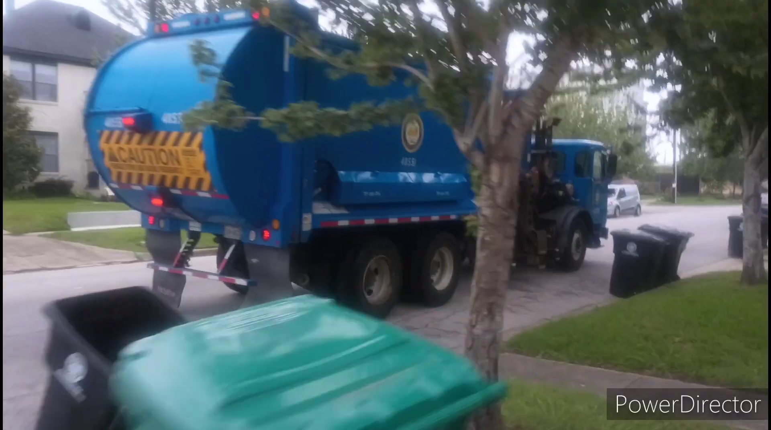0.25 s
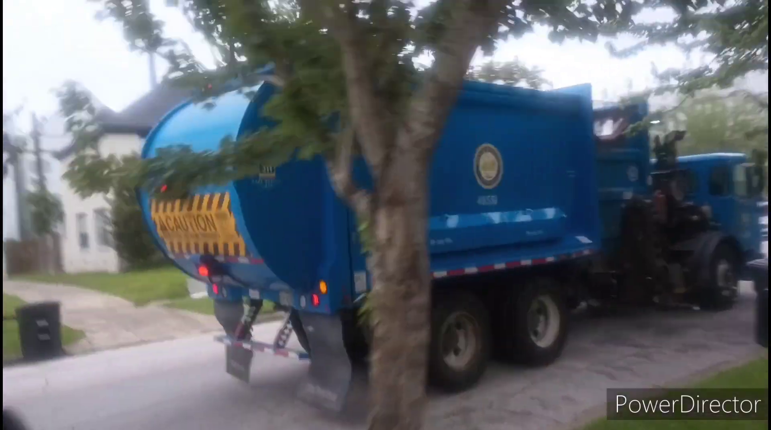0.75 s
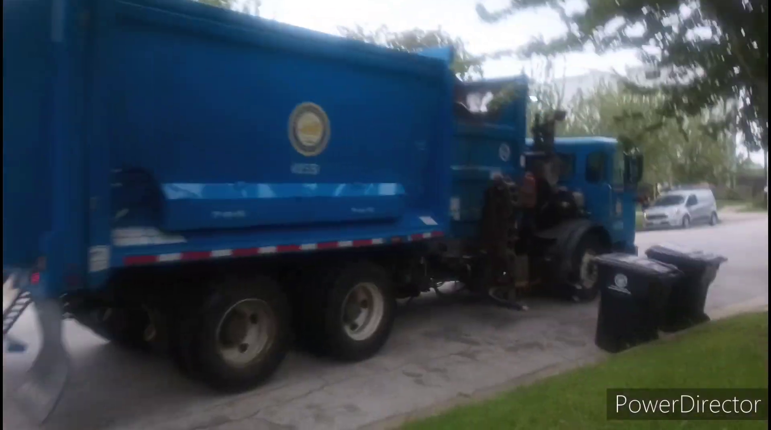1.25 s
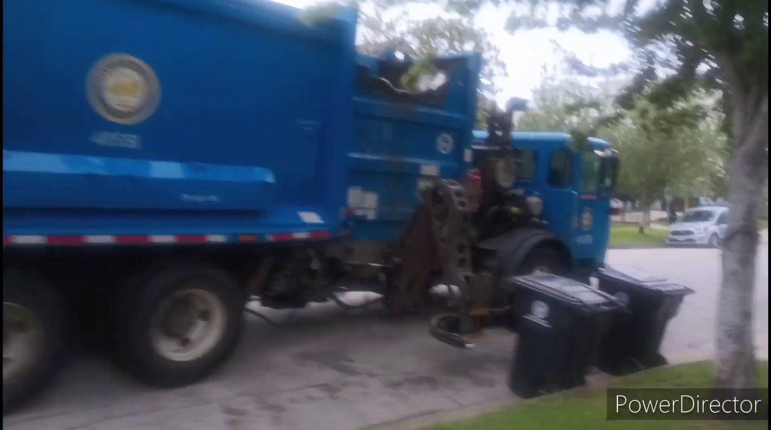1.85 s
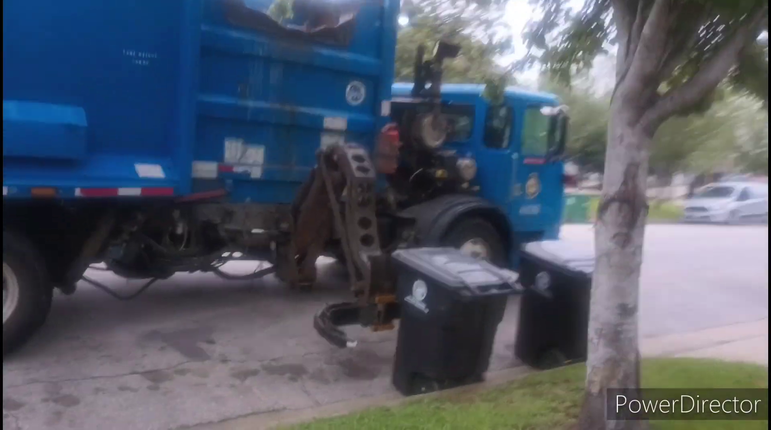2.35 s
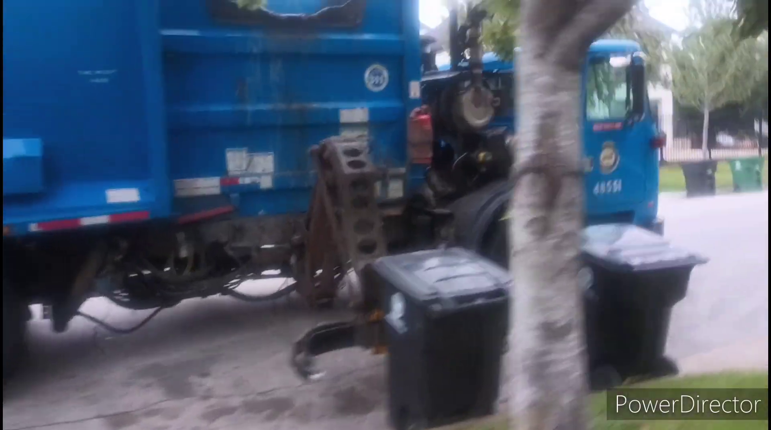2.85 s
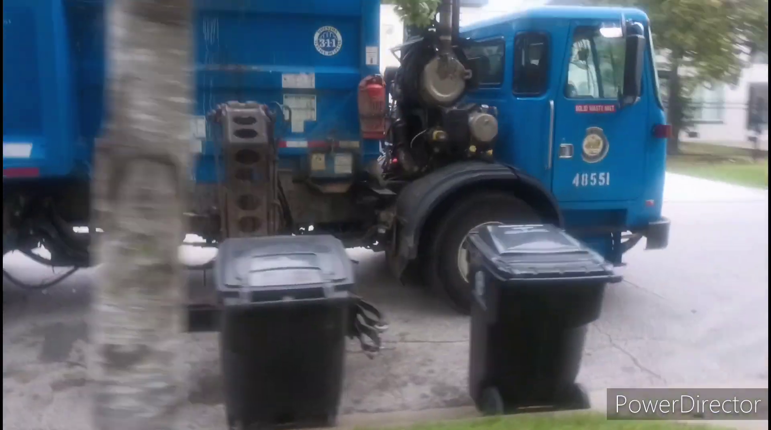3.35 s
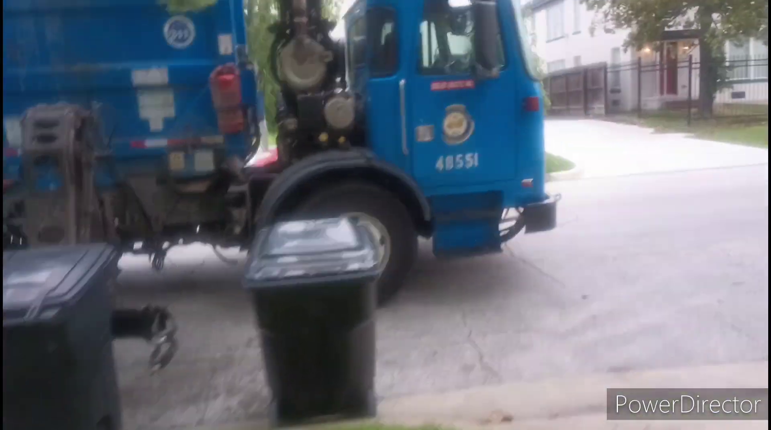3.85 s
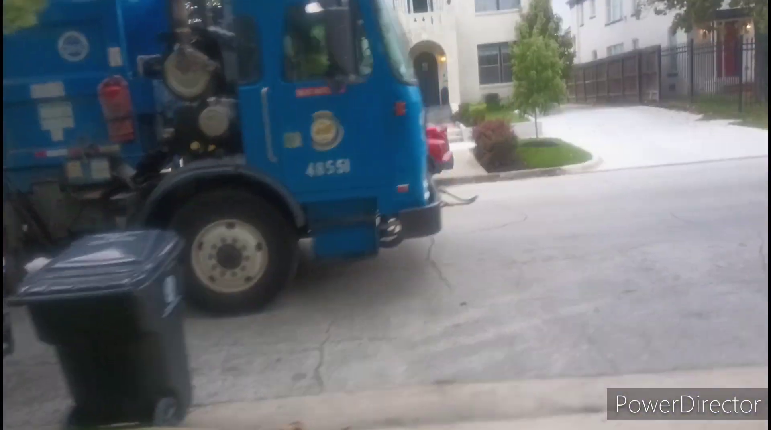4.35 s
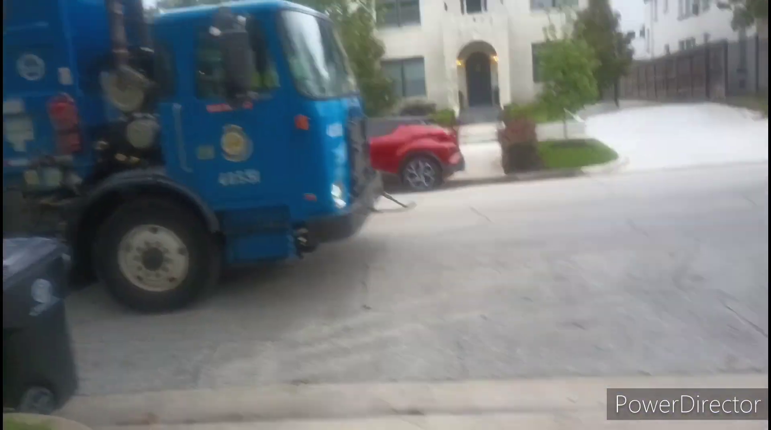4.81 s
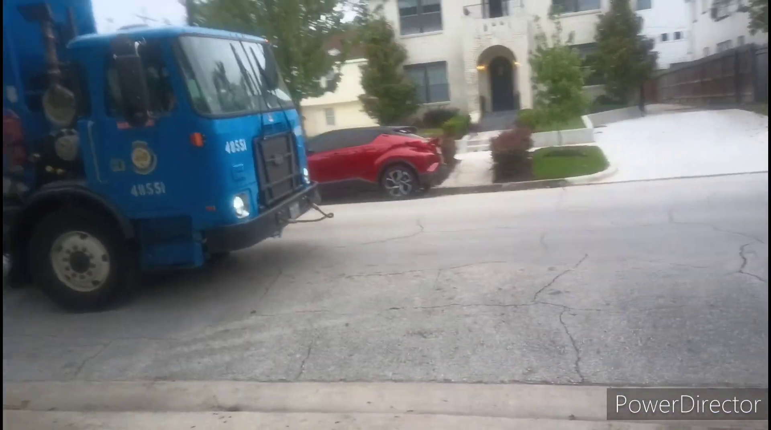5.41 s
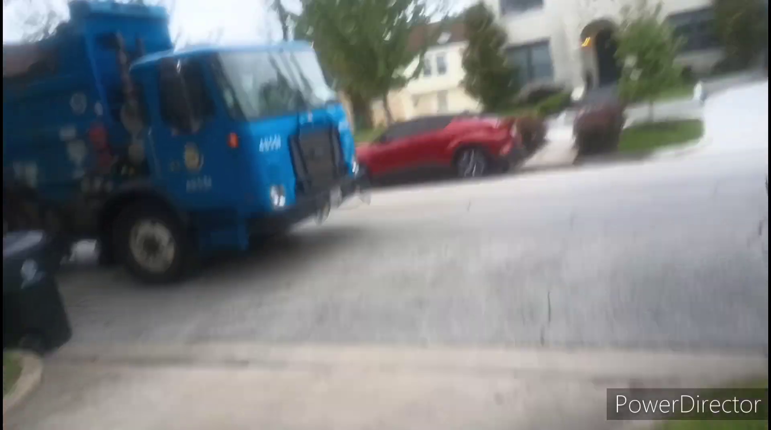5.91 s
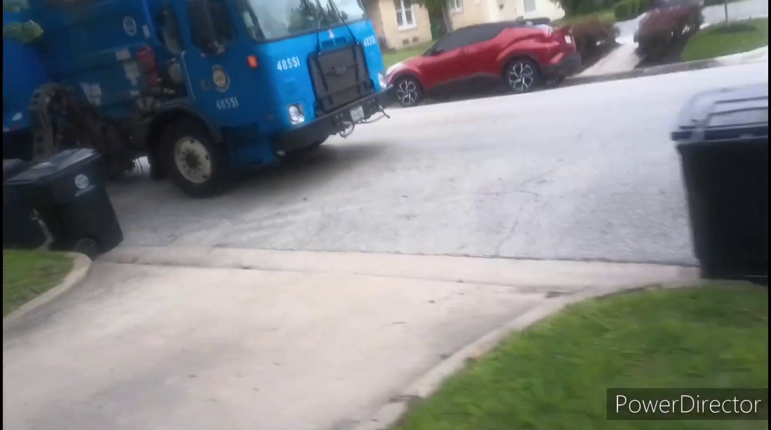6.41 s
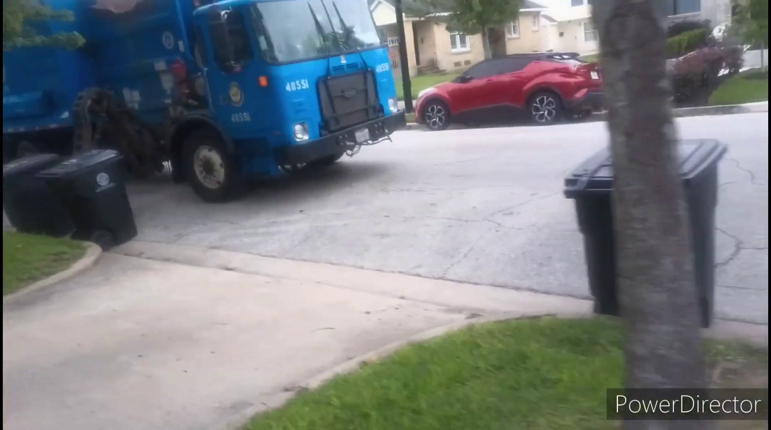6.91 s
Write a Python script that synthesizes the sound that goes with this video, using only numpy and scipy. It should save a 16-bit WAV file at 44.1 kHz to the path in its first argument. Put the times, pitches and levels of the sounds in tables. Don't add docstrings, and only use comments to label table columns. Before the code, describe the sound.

Outdoor street, phone carried past a large idling truck. A faint opening drops to silence, then brake squeal, clanks and a brief valve hiss arrive together. Hard metal blows follow, then steady diesel clatter, hydraulic whine and small taps, with uneven low wind buffeting stronger on the left. A sharp compressed-air blast roars and sizzles, tails into a descending whistle, and leaves softer idling with tiny ticking.

```python
import sys
import numpy as np
from scipy import signal
from scipy.fft import rfft, irfft, next_fast_len
from scipy.io import wavfile
from scipy.ndimage import uniform_filter1d, map_coordinates

SR = 44100
rng = np.random.default_rng(int(sys.argv[2]) if len(sys.argv) > 2 else 0)


def generate_wav(sig):
    pcm = np.round(np.clip(np.atleast_2d(sig).T, -1, 1) * 32767).astype(np.int16)
    wavfile.write(sys.argv[1], SR, pcm)


def linear_from_db(decibels):
    return 10 ** (np.asarray(decibels, float) / 20)


N = 316152

# (time [s], peak [dB], pitch [Hz], left minus right [dB])
EDDIES = [(.538, -20.5, 95.6, 5), (.552, -30.5, 198, 5), (2.373, -24, 104, 12), (2.466, -17, 199, 17),
          (2.609, -21, 75, 9), (2.635, -26, 120, 6), (1.364, -21, 84, 16), (1.747, -15, 135, 22),
          (2.434, -14.5, 90, 17), (2.486, -13, 125, 20), (2.543, -17.5, 167, 26), (2.658, -28, 128, 1),
          (3.508, -12, 136, 20), (3.585, -13.5, 195, 24), (3.618, -14, 255, 21), (3.685, -10, 173, 27.5),
          (3.753, -12.5, 350, 26), (3.789, -15, 290, 22), (3.858, -18, 199, 35), (3.97, -17, 145, 14),
          (4.057, -14, 174, 16), (4.267, -24.5, 153, 14), (4.321, -18.5, 172, 10), (4.678, -19, 115, 24.0),
          (6.456, -24, 99.6, -20)]


def unit(x):
    return x / np.sqrt(np.mean(x ** 2) + 1e-20)


def along(points, hz):
    f, v = np.transpose(points)
    return np.interp(np.log(hz + 1), np.log(f + 1), v)


def curves(rows):
    s, *cols = np.transpose(rows)
    return [np.interp(np.arange(N) / SR, s, c) for c in cols]


def during(rows, fade):
    t = np.arange(N) / SR
    return np.clip(np.minimum(t - rows[0][0], rows[-1][0] - t) / fade, 0, 1)


def wobble(rate, count=N):
    knots = int(count * rate / SR) + 2
    return np.interp(np.arange(count) * rate / SR, np.arange(knots), rng.standard_normal(knots))


def filtered(x, response):
    m = next_fast_len(N + 8192)
    return irfft(rfft(x, m) * response(np.fft.rfftfreq(m, 1 / SR)), m)[..., :N]


def resonances(modes, f):
    total = 0
    for k, (c, w, db) in enumerate(modes):
        total = total + (-1) ** k * linear_from_db(db) * 1j * f * w / (c * c - f * f + 1j * f * w)
    return total


def rush(spectrum, patchy_db, modes=(), lift=0, alike=None, size=512):
    # (frequency [Hz], left-right correlation)
    usual_alike = [(300, 0.81), (1000, 0.8), (2500, 0.45), (6000, 0.35), (12000, 0.2)]
    if alike is None:
        alike = usual_alike
    z = signal.stft(rng.standard_normal((2, N)), nperseg=size)[2]
    field = uniform_filter1d(rng.standard_normal(z.shape[1:]), size=3, axis=0)
    field = uniform_filter1d(field, size=8, axis=1)
    pair = signal.istft(z * linear_from_db(patchy_db * unit(field)), nperseg=size)[1][:, :N]

    def mid_side(hz):
        turn = np.arccos(np.clip(along(alike, hz), -1, 1)) / 2
        colour = linear_from_db(along(spectrum, hz)) * (1 + lift * np.abs(resonances(modes, hz)))
        return colour * [np.cos(turn), np.sin(turn)]

    mid, side = filtered(pair, mid_side)
    return unit(np.array([mid + side, mid - side]))


def panned(x, pan_db):
    return x * linear_from_db(np.array([pan_db / 2, -pan_db / 2]))


def ports(pan_db):
    return linear_from_db(np.minimum([[pan_db - 4.5], [7.0 - pan_db]], 5))


def whine(hz, spread_hz, count=N):
    phase = 2 * np.pi * np.cumsum(hz + spread_hz * wobble(500, count)) / SR
    grip = linear_from_db(2.2 * wobble(40, count))
    out = []
    for port in range(2):
        strength = grip * linear_from_db(2.4 * wobble(140, count))
        out.append(strength * np.sin(phase + 1.4 * wobble(25, count)))
    return np.array(out)


def sing(rows, spread_hz):
    hz, db = curves(rows)
    return during(rows, 0.0074) * linear_from_db(db) * whine(hz, spread_hz)


def glide(s, length, from_hz, to_hz, db, spread_hz, soft):
    u, out = np.linspace(0, 1, int(length * SR)), np.zeros((2, N))
    swell = np.abs(np.sin(np.pi * u)) ** soft
    tone = whine(from_hz + (to_hz - from_hz) * u, spread_hz, len(u))
    out[:, round(s * SR):][:, :len(u)] = linear_from_db(db) * swell * tone
    return out


def snaps(rows, spectrum, t60):
    strength, t = np.zeros(N + SR), np.arange(SR // 10) / SR
    for s, db in rows:
        strength[round(s * SR):][:len(t)] += linear_from_db(db - 60 * t / t60)
    return strength[:N] * rush(spectrum, 1.5)


def blows(t60, bright=False):
    # (time [s], peak [dB], bright share [dB])
    clanks = [(0.564, -31, 6), (0.591, -32.5, -5), (0.751, -18.5, -4), (0.77, -25.5, 2), (0.831, -18, -3.5),
              (0.849, -45, -15), (0.935, -29, 3), (1.409, -41, 15), (1.474, -17, -9), (1.494, -37, 20),
              (1.522, -13.5, 0.5), (1.579, -21.5, -7), (1.675, -24.5, -2), (1.9, -36, 6),
              (2.542, -24.5, -4), (2.66, -35.5, 5.5), (2.704, -27.5, -27), (3.418, -27, -19),
              (5.876, -48, 10.5)]
    out, t = np.zeros(N + SR), np.arange(SR // 2) / SR
    for s, peak_db, bright_db in clanks:
        db = peak_db + (bright_db if bright else 0)
        out[round(s * SR):][:len(t)] += linear_from_db(db - 60 * t / t60) * (1 - np.exp(-t / 0.0083))
    return out[:N]


def street(beat):
    # (time [s], level [dB])
    hiss = [
        (0, -64.5),
        (.3, -65),
        (.56, -43.5),
        (.95, -50),
        (1.6, -40.5),
        (2.5, -46.5),
        (3.5, -47.5),
        (6.2, -50.5),
        (7.17, -56),
    ]
    # (frequency [Hz], level [dB])
    hiss_colour = [(4410, -10), (7500, -4.5), (8310, -8), (9210, -8), (11400, -12.5), (13400, -14),
                   (14900, -2.5), (15800, -7.5)]
    level_db, = curves(hiss)
    return linear_from_db(level_db) * panned(rush(hiss_colour, 1.4), np.array([2.5])) * unit(1 + 0.19 * beat)


def wind():
    # (time [s], level [dB], left minus right [dB])
    buffeting = [(.5, -50, -1), (.6, -39.5, -5), (.86, -49, -10), (1.1, -42.5, 7), (1.45, -32, 4),
                 (1.62, -38, -14), (1.95, -34.5, 10), (2.28, -38.5, 1), (2.47, -42.5, 9), (2.7, -36, 0.5),
                 (3.4, -39.5, 2), (3.53, -39, 13), (4.1, -30.5, 13), (4.66, -37, 15), (4.73, -46.5, 12),
                 (5.45, -50.5, 7.5), (5.7, -46, -1), (7.17, -55.5, 1)]
    # (frequency [Hz], level [dB])
    rumble = [(22, -35), (60, -4.5), (113, 0), (193, -5), (268, -13), (303, -21), (400, -28), (520, -18.5),
              (880, -120)]
    puff_db, puff_s = -23.5, 0.047
    db, pan_db = curves(buffeting)
    t = np.arange(N) / SR
    share = np.sqrt(2 / np.cosh(pan_db * np.log(10) / 20))
    gust = share * panned(linear_from_db(db), pan_db)
    for s, peak_db, hz, side_db in EDDIES:
        gust = gust + linear_from_db(peak_db + puff_db) * ports(side_db) * np.exp(-((t - s) / puff_s) ** 2)

    def lumps(rate):
        return linear_from_db(2.6 * np.array([wobble(rate), wobble(rate)]))

    low = unit(lumps(16) * rush(rumble, 2.1, alike=[(100, 0.31)]))
    flap_colour = [(70, -26), (140, 3.5), (230, 3.5), (380, -1), (700, -34)]
    flap = unit(lumps(30) * rush(flap_colour, 2.6, alike=[(100, 0.28)]))
    return linear_from_db(-1.0) * gust * low + linear_from_db(8.5) * gust ** 1.54 * flap


def thumps():
    out, t = np.zeros((2, N + SR)), np.arange(SR // 8) / SR
    for s, db, hz, pan_db in EDDIES:
        swing = linear_from_db(db - 60 * t / 0.069) * (1 - np.exp(-t / 0.00097)) * np.sin(2 * np.pi * hz * t)
        out[:, round(s * SR):][:, :len(t)] += swing * ports(pan_db)
    return filtered(out[:, :N], lambda hz: (1j * hz / (45 + 1j * hz)) ** 2)


def pins():
    # (time [s], peak [dB], pitch [Hz], t60 [s])
    struck = [
        (1.4936, -14, 5770, 0.086),
        (1.522, -21, 3550, .07),
        (1.675, -21, 3500, .06),
        (1.681, -31.5, 6400, 0.22),
        (3.907, -26, 4560, 0.051),
        (5.447, -27, 6240, 0.069),
    ]
    out, t = np.zeros(N + SR), np.arange(SR // 4) / SR
    for s, db, hz, t60 in struck:
        decay = linear_from_db(db - 60 * t / t60 + 1.5 * wobble(140, len(t)))
        out[round(s * SR):][:len(t)] += decay * (1 - np.exp(-t / 0.00074)) * np.sin(2 * np.pi * hz * t)
    return out[:N]


def rings():
    # (time [s], length [s], pitch [Hz], level [dB])
    squeaks = [(.68, 0.074, 10700, -41), (.81, 0.24, 10560, -33), (1.05, 0.075, 11000, -29),
               (1.1, 0.048, 8140, -28), (1.1, 0.084, 11000, -48), (.72, .08, 13850, -38),
               (.71, 0.027, 4040, -41.5), (0.765, 0.04, 560, -33), (.92, 0.039, 1372, -28),
               (1.0, 0.081, 662, -37.5), (1.09, 0.059, 650, -35), (1.09, 0.061, 1210, -34.5),
               (1.3, 0.12, 2200, -35), (2.7, 0.079, 1824, -35), (6.96, .05, 4600, -57),
               (2.0, 0.15, 5100, -44), (2.17, 0.21, 5000, -44), (3.258, 0.14, 4350, -41),
               (2.15, 0.16, 4040, -48), (4.745, 0.14, 541, -40.5)]
    out, t = np.zeros((2, N + SR)), np.arange(SR // 2) / SR
    for s, length, hz, db in squeaks:
        swell = np.sin(np.pi * np.clip(t / length, 0, 1)) ** 0.2 * linear_from_db(3 * wobble(60, len(t)))
        tone = whine(hz, 10 + .03 * min(hz, 5500), len(t))
        out[:, round(s * SR):][:, :len(t)] += linear_from_db(db + 3) * swell * tone
    return out[:, :N]


def metalwork():
    # (frequency [Hz], width [Hz], level [dB])
    steel = [(680, 19, -5), (1070, 63, -10.5), (1830, 35, -41), (3440, 270, -5.5), (3870, 29, -2),
             (5100, 53, -22), (5740, 20, 4), (6500, 21, -9), (6920, 30, -1)]
    # (start [s], length [s], from [Hz], to [Hz], level [dB])
    panel_hums = [
        (1.8, .8, 1130, 1050, -42),
        (2.12, .5, 1920, 1900, -43),
        (2.5, .58, 1900, 1850, -38),
        (2.85, .52, 990, 1030, -41),
        (3.3, .5, 1920, 1850, -37),
        (3.44, .7, 1725, 1725, -40),
        (3.6, .5, 930, 950, -44),
        (4.02, .55, 1010, 980, -42),
        (2.55, .3, 1620, 1540, -43),
    ]
    # (time [s], peak [dB])
    hard_edges = [(.5538, -32), (.5637, -26), (.5707, -27), (.603, -20), (.7513, -19), (.772, -21),
                  (.778, -13), (.8346, -15), (.85, -17), (.9369, -20), (1.4772, -23), (1.4821, -17),
                  (1.4936, -19), (1.5235, -7.5), (1.528, -20), (1.536, -16), (1.544, -11), (1.551, -17),
                  (1.587, -16), (1.603, -21), (1.705, -16), (.842, -19), (.858, -22), (2.71, -27),
                  (5.8785, -33), (5.895, -38), (6.405, -39.5), (6.984, -42)]
    # (time [s], peak [dB])
    clicks = [(5.7194, -50), (5.7694, -53), (5.8257, -56), (5.8745, -54), (6.0094, -53), (6.0541, -50),
              (6.1035, -52), (6.1419, -49), (6.1863, -46), (6.2322, -47), (6.2761, -52), (6.322, -49),
              (6.3644, -49), (6.4144, -54), (6.4587, -54), (6.5071, -51), (6.5535, -52), (6.6094, -49),
              (6.6594, -54), (6.7164, -55), (6.7795, -52), (6.8423, -52), (6.9022, -50), (6.9636, -54),
              (7.0319, -55), (7.0998, -50)]
    # (time [s], peak [dB])
    firing_ticks = [(2.0717, -30), (2.2498, -30), (2.4553, -32), (2.5042, -29), (2.5376, -26), (2.5556, -23),
                    (2.584, -27), (2.6319, -31), (2.6574, -27), (2.7581, -35), (2.814, -28), (2.9168, -31),
                    (3.2774, -26), (3.3303, -29), (3.3837, -32), (3.4356, -29), (3.4865, -33), (3.5404, -32),
                    (3.6466, -31), (4.2303, -33), (4.3849, -32), (4.4917, -33), (5.8785, -33)]
    clank_t60 = 0.17
    body = rush([(300, -9), (550, 6.5), (1200, 12.5), (2600, 12.5), (3600, -36.0)], 3.0, steel, lift=0.25)
    edge_colour = [(2200, -25.5), (3000, -1.0), (6500, -9.5), (9000, -19.0), (15000, -34.5)]
    edge = rush(edge_colour, 3.3, steel, lift=1.8)
    clanking = blows(clank_t60) * body + linear_from_db(-1.5) * blows(clank_t60, bright=True) * edge
    hums = linear_from_db(3) * sum(glide(*row, spread_hz=65, soft=.4) for row in panel_hums)
    crack_colour = [(300, -26), (800, -4), (2500, 1), (4500, -5.5), (7500, -13), (12000, -31)]
    cracks = linear_from_db(-6) * snaps(hard_edges, crack_colour, t60=.025)
    click_colour = [(6000, -40), (12000, -16), (14000, -6), (15000, 0), (15800, -6)]
    ratchet = linear_from_db(2.5) * snaps(clicks, click_colour, t60=.035)
    tap_colour = [(2000, -25), (3500, -7), (4600, -1), (5600, -4), (6600, 0), (8000, -14), (12000, -30)]
    taps = linear_from_db(-7) * snaps(firing_ticks, tap_colour, t60=0.045)
    return taps + hums + cracks + ratchet + pins() + rings() + clanking


def brakes():
    # (time [s], pitch [Hz], level [dB])
    main_modes = [
        [(.63, 9486, -46), (.658, 9680, -26), (.72, 9790, -21), (.77, 9830, -23), (.795, 9720, -17),
         (.82, 9760, -12), (.89, 9930, -15), (.94, 9960, -36)],
        [(.87, 10140, -34), (.9, 10170, -18), (.96, 10210, -21), (1.02, 10150, -17), (1.07, 10020, -17),
         (1.11, 9870, -22), (1.165, 9860, -24), (1.2, 9900, -40)],
    ]
    # (start [s], length [s], from [Hz], to [Hz], level [dB])
    side_modes = [
        (.745, .22, 11930, 12280, -41),
        (.53, .2, 14950, 14350, -43),
        (.73, .17, 14450, 15100, -33),
        (1.155, .06, 12750, 12650, -36),
        (1.215, .09, 12130, 11980, -35),
        (1.28, .16, 11980, 12170, -34),
        (.89, .17, 13470, 13400, -32),
        (.76, .1, 6750, 6600, -33),
    ]
    # (time [s], extra level [dB])
    grips = [(.683, 4), (.711, 4), (.731, 4), (.772, 5), (.815, 2), (.848, 5), (.858, 4), (.87, 6),
             (.887, 8), (.901, 8), (.914, 4), (.934, 5), (.953, 4), (1.019, 8), (1.039, 6), (1.065, 7),
             (1.093, 4), (1.119, 5), (1.163, 5)]
    grip_s, slack_db = .004, -4
    t = np.arange(N) / SR
    jerk_db = slack_db + sum(db * np.exp(-((t - s) / grip_s) ** 2) for s, db in grips)
    loud = linear_from_db(jerk_db + 0.2) * sum(sing(rows, spread_hz=55) for rows in main_modes)
    rest = linear_from_db(3.5) * sum(glide(*row, spread_hz=55, soft=.6) for row in side_modes)
    return panned(loud, np.array([3.5])) + panned(rest, np.array([1.2]))


def air():
    # (time [s], flow [dB], sharpness [dB]: high pressure sizzles, low pressure roars)
    bursts = [
        [(.92, -46, -3), (.96, -30, 6), (1.032, -23, 4), (1.228, -29, 10), (1.318, -44, 10), (1.46, -30.5, -6)],
        [(4.59, -47, -8), (4.62, -25.5, 9.5), (4.67, -18.5, 3), (4.926, -17.5, -4), (5.08, -22, -3.5),
         (5.1, -24.5, -8), (5.252, -32, -1.5), (5.48, -39.5, 7), (5.85, -53.5, -5)],
    ]
    burst_pan_db = (1.8, 2.5)
    # (time [s], pitch [Hz], level [dB])
    last_air = [
        (5.17, 9500, -46),
        (5.24, 8450, -39),
        (5.3, 7800, -37),
        (5.36, 7200, -34.5),
        (5.44, 6230, -35),
        (5.52, 5150, -38),
        (5.57, 4450, -38),
        (5.62, 3900, -52),
    ]
    # (frequency [Hz], width [Hz], level [dB])
    nozzle = [(1840, 60, -4), (2800, 250, -2), (4300, 450, 2), (5120, 150, -4), (6860, 350, 0)]
    # (frequency [Hz], level [dB])
    roar_colour = [(760, -61), (1300, -19), (1550, -11), (1890, 0.5), (2330, -2), (2810, 3), (3500, -2),
                   (4550, -63.5), (7700, -120)]
    jet_colour = [(1940, -60.5), (3300, -3), (3470, -3.5), (4810, -6), (5980, 3), (6830, -4.5),
                  (8200, -8.5), (13000, -21)]
    sizzle_colour = [(4410, -28), (7500, 2), (7960, 1.5), (9160, 6), (9930, 5), (13500, 1), (14900, 5.5),
                     (15500, 10), (15800, -5)]
    # (frequency [Hz], left-right correlation)
    jet_alike = [(1000, .5), (2400, .4), (3200, .88), (3900, .88), (4800, .4), (8000, .5), (12000, .2)]
    roar_db, sizzle_db, sizzle_follows = -9.5, 0.5, 0.5
    subsonic_s, dull_hz, dull_db = 5.08, 10500, -5
    flow_db, sharp_db = curves(sum(bursts, []))
    flutter = linear_from_db(0.7 * wobble(900))
    roar = rush(roar_colour, 1.8, nozzle, lift=0.56, alike=jet_alike)
    jet = rush(jet_colour, 2.3, nozzle, lift=1.2, alike=jet_alike, size=1024)
    jet = linear_from_db(flow_db + roar_db - sharp_db) * roar + linear_from_db(flow_db) * jet
    jet = filtered(jet, lambda hz: 1 - .1 * np.exp(-((hz - 3500) / 220) ** 2))
    sizzle = linear_from_db(flow_db + sizzle_db + sizzle_follows * sharp_db) * rush(sizzle_colour, 0.59)
    slow = np.clip((np.arange(N) / SR - subsonic_s) / .03, 0, 1)
    dull = filtered(sizzle, lambda hz: linear_from_db(dull_db * np.clip(hz / dull_hz - .9, 0, .2) * 5))
    sizzle = (1 - slow) * sizzle + slow * linear_from_db([[1.5], [-1.5]]) * dull
    both = flutter * (jet + panned(sizzle, np.array([2.5])))
    vented = 0
    for rows, pan_db in zip(bursts, burst_pan_db):
        vented = vented + during(rows, 0.039) * panned(both, np.array([pan_db]))
    return vented + sing(last_air, spread_hz=160)


def firing_beat():
    # (time [s], firings so far)
    firings = [
        (0, 0),
        (2.4553, 96),
        (2.9656, 116),
        (3.2774, 128),
        (4.4917, 174),
        (7.2, 275.4),
    ]
    turn = curves(firings)[0]
    size = linear_from_db(2.1 * rng.standard_normal(int(turn[-1]) + 1))[turn.astype(int)]
    beat = size * linear_from_db(4.5 * (turn % 2 < 1)) * np.exp(-3.5 * (turn % 1))
    return uniform_filter1d(beat, size=100)


def engine():
    # (time [s], level [dB], brightness of the valve clatter over the drone [dB])
    walk = [(.5, -56, 1), (.6, -35, -3.5), (.72, -38.5, -8.5), (.9, -45, 6.5), (1.1, -41, 15),
            (1.42, -36, -2.5), (1.62, -27, -3.5), (1.92, -35.5, -6.5), (2.3, -40, -3), (3.2, -38, -6),
            (3.45, -37.5, -3.5), (3.9, -39.5, -6.5), (4.55, -35, -7.5), (4.64, -40, -5), (4.92, -47, 20),
            (5.5, -47, -3), (5.65, -42, -8), (7.17, -44.5, -9)]
    # (frequency [Hz], level [dB])
    exhaust_colour = [(24, -48), (40, -26), (64, -6), (98, -4.5), (211, -5), (349, -4.5), (450, -8.5),
                      (580, -13.5), (990, -120)]
    drone_colour = [(150, -27), (250, -12.5), (302, -5.5), (541, -7), (1020, 1.5), (1220, -4.5),
                    (1500, -6.5), (1950, -15.5), (3300, -120)]
    knock_colour = [(760, -28), (1300, -12.5), (1890, -2), (2070, -3.5), (2380, -5.5), (2900, -6.5),
                    (3770, -51.5), (6380, -120)]
    tick_colour = [(1470, -40.5), (2500, -6.5), (2990, -3.5), (3710, -3.5), (4920, -5.5), (5690, -6.5),
                   (6490, -7), (8000, -20), (10400, -34), (17600, -120)]
    # (frequency [Hz], width [Hz], level [dB])
    panels = [(350, 91, -2), (701, 152, -5), (935, 18, -11), (1046, 46, -6.5), (1424, 250, -6),
              (1727, 70, -1.5), (1827, 130, -7.5), (2320, 136, -3.5)]
    valves = [(4550, 280, -4), (5220, 300, -6.5), (6620, 160, 5)]
    # (frequency [Hz], level [dB])
    front = [(500, -1), (720, -0.5), (900, 1), (1200, -7), (1500, 2.5), (1900, -3.5), (2300, -1)]
    # from, to [s]; in effect a quick step
    round_cab = (5.9, 5.7)
    knock_db, knock_follows = -0.5, 0.42
    shake_dbs, shake_t60 = (-17.5, -19, -22), 0.19
    drone_db, bright_db = curves(walk)
    steady_db = [drone_db, drone_db + knock_db + knock_follows * bright_db, drone_db + bright_db]
    shaken = [linear_from_db(db) + linear_from_db(shake_db) * blows(shake_t60) for db, shake_db in zip(steady_db, shake_dbs)]
    hum, thud, tick = shaken
    beat = firing_beat()
    exhaust = linear_from_db(-7) * hum * rush(exhaust_colour, 2.3, alike=[(60, 0.76), (290, 0.9)])
    drone = hum * rush(drone_colour, 2.4, panels, lift=2.2, size=1536) * unit(1 + .2 * beat)
    knock = thud * rush(knock_colour, 2.4, panels, lift=2.2, size=1536) * unit(1 + .25 * beat)
    ticking = 0.61 * unit(beat) * rush(tick_colour, 3.2, valves, lift=2.3)
    clatter = tick * (rush(tick_colour, 1.9, size=1024) + ticking)
    ahead = np.interp(np.arange(N) / SR, round_cab, (0, 1))
    block = drone + knock
    block = (1 - ahead) * block + ahead * filtered(block, lambda hz: linear_from_db(along(front, hz)))
    return exhaust + block + clatter + street(beat)


def scene():
    # (time [s], left lag [samples], left minus right [dB])
    bearing = [
        (0, -4.5, -3),
        (.6, 7.5, -4.5),
        (1.7, 7.5, -1),
        (2.2, 1, -1),
        (3.2, 2, -1),
        (4.2, -2, -1),
        (4.7, -19.5, 3.5),
        (5.3, -18, 1),
        (5.8, -6, -0.5),
        (7.17, -3, -0.5),
    ]
    lag, pan_db = curves(bearing)
    truck = panned(engine() + metalwork(), pan_db) + air()
    heard = []
    for side, sign in zip(truck, (1, -1)):
        heard.append(map_coordinates(side, [np.arange(N) - sign * lag / 2], mode="nearest"))
    return np.array(heard) + brakes() + wind() + thumps()


def thinned(x, margin_db, starved_db, weak_db):
    hz, t, z = signal.stft([x[0] + x[1], x[0] - x[1]], SR, window="cosine", nperseg=2048)
    line_hz = hz[:1024, None]
    power = np.abs(z[:, :1024]) ** 2
    treble = np.clip((line_hz - 6500) / 1500, 0, 1) * (line_hz < 14200)
    band = np.repeat(power.reshape(2, 64, 16, -1).mean(axis=2), 16, axis=1)
    luck = unit(uniform_filter1d(rng.standard_normal((64, len(t))), size=2))
    luck = np.repeat(luck, 16, axis=0)
    loud = 10 * np.log10(band / band.mean(axis=(0, 1)) + 1e-12)
    need = margin_db - 1.2 * (1 - treble) + starved_db * luck * treble * np.clip(-loud / 20, .1, 1)
    mask = uniform_filter1d(band.mean(axis=0), size=150, axis=0) * linear_from_db(2 * need)
    strong = power > band * linear_from_db(2 * weak_db) * (.3 + .7 * treble)
    keep = ((band > mask) | (line_hz < 2500)) & strong
    z[:, :1024] *= keep * (line_hz < 15650)
    mid, side = signal.istft(z, SR, window="cosine", nperseg=2048)[1][:, :N] / 2
    return np.array([mid + side, mid - side])


def top_cut(x):
    return signal.sosfilt(signal.butter(12, 16860, fs=SR, output="sos"), x)


def record(dry):
    # from, to [s]
    silence = (0.159, 0.5197)
    t = np.arange(N) / SR
    gate = np.clip((silence[0] - t) / 0.002, 0, 1) + np.clip((t - silence[1]) / 0.042, 0, 1) ** 3
    sparse = thinned(dry, margin_db=-6, starved_db=5, weak_db=-1)
    return top_cut(sparse * gate)


dry = scene()
out = record(dry)
generate_wav(out)
```